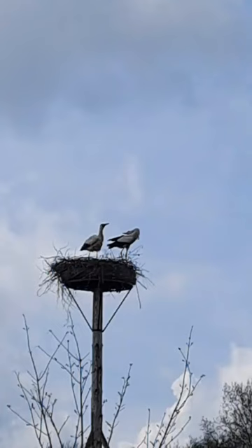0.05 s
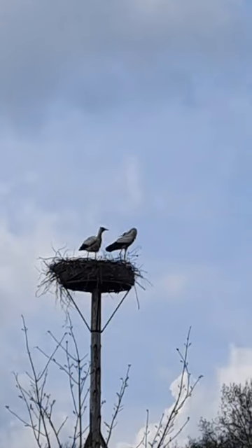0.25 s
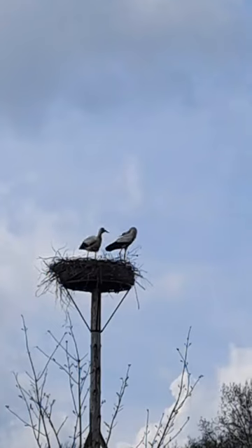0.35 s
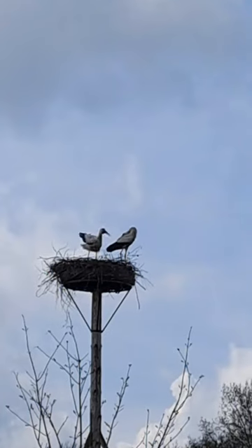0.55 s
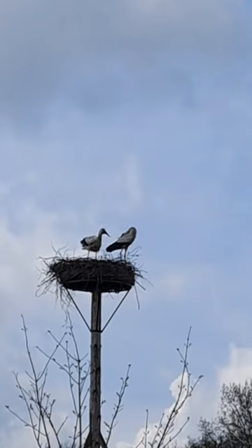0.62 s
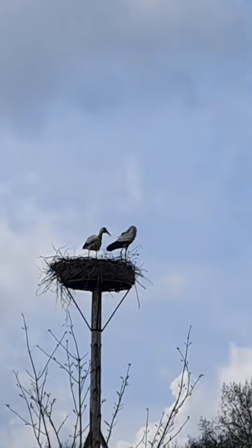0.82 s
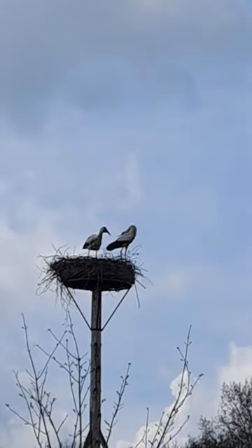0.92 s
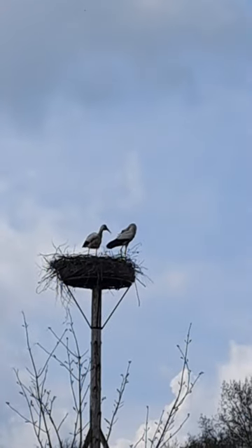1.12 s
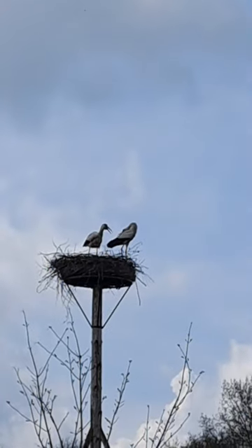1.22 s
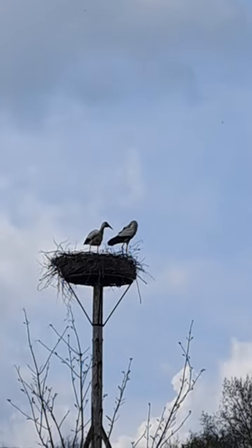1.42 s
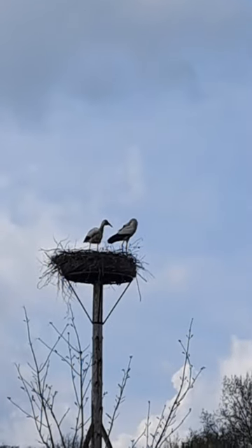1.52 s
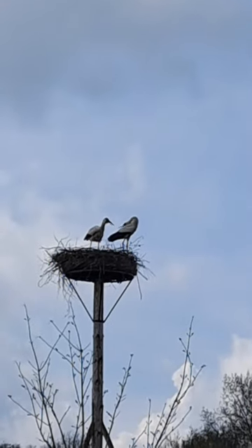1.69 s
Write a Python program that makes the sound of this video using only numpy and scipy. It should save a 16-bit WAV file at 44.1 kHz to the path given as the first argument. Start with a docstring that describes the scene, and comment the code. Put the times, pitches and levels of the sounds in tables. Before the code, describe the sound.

Fast, hollow bill clattering from a pair of storks, over gusts of wind on the microphone.

```python
"""Two storks clap their bills on a pole nest, one hollow and loud, the other thinner and a little faster. Each
impact excites the damped modes of bill and throat pouch, reflects once from the ground and scatters among twigs
and trees. Turbulent wind buffets the microphone, and small birds chirp far off. After a quieter opening the
sound drops out briefly and the scene changes."""
import sys
import numpy as np
from scipy import signal
from scipy.fft import rfft, irfft, next_fast_len
from scipy.io import wavfile
from scipy.ndimage import uniform_filter1d

SR = 44100
rng = np.random.default_rng(int(sys.argv[2]) if len(sys.argv) > 2 else 0)


def generate_wav(signal):
    """Clip the signal to [-1, 1] and save it as 16-bit WAV at the path in sys.argv[1]."""
    frames = np.transpose(np.atleast_2d(signal))
    scaled = np.clip(frames, -1, 1) * 32767
    pcm = np.round(scaled).astype(np.int16)
    wavfile.write(sys.argv[1], SR, pcm)


N = 77175
SILENCE_S = (0.18, 0.205)  # start and end


def amp(db):
    """Amplitude ratio of a level in decibels."""
    return 10 ** (np.asarray(db) / 20)


def along(points, hz):
    """Interpolation of (Hz, value) points on a logarithmic frequency axis."""
    point_hz, values = np.transpose(points)
    return np.interp(np.log(hz + 1), np.log(point_hz + 1), values)


def fade(t, t60):
    """Exponential damping: 60 dB lost in t60 seconds."""
    return np.exp(-np.log(1000) * t / t60)


def filtered(x, response):
    """Linear filtering: the spectrum of x times a frequency response."""
    size = next_fast_len(N + SR // 2)
    return irfft(rfft(x, size) * response(np.fft.rfftfreq(size, 1 / SR)), size)[..., :N]


def add(out, start_s, x):
    """Superposition of x on out from start_s onward."""
    i = max(round(start_s * SR), 0)
    out[i:i + len(x)] += x[:max(len(out) - i, 0)]


def impact_pulse(spectrum, size=1024):
    """Minimum phase gives the sharpest causal pulse with a given spectrum."""
    cepstrum = irfft(np.log(amp(along(spectrum, np.fft.rfftfreq(size, 1 / SR)))))
    cepstrum[1:size // 2] *= 2
    cepstrum[size // 2 + 1:] = 0
    return irfft(np.exp(rfft(cepstrum)))


def bill(claps, modes, snap, snap_db, grit, lead_s, lead_db, rebound_s, rebound_db):
    """Impact excitation: a light touch, the main blow and a rebound each snap and ring the modes."""
    out, t = np.zeros(N), np.arange(SR // 20) / SR
    hz, db, t60 = np.transpose(modes)[:, :, None]
    pulse = impact_pulse(snap)
    pouch, upper = hz < 1100, hz > 2600
    build_up = 1 - np.exp(-t / 0.00008)
    spread_db, detune_share = 2.5, 0.0048  # scatter of each mode from clap to clap
    for start_s, level_db, pitch, knock_db, upper_db, bright_db in claps:
        gain = amp(db + knock_db * pouch + upper_db * upper + spread_db * rng.standard_normal(hz.shape))
        tuned_hz = hz * pitch * (1 + detune_share * rng.standard_normal(hz.shape))
        ring = build_up * (gain * fade(t, t60) * np.cos(2 * np.pi * tuned_hz * t)).sum(0)
        for offset_s, contact_db in [(-lead_s, lead_db), (0, 0), (rebound_s, rebound_db)]:
            contact = grit * rng.standard_normal(len(t)) * fade(t, t60=0.0036)
            contact[0] = 1  # an impulse leads the grit
            crack = amp(snap_db + bright_db) * signal.fftconvolve(contact, pulse)[:len(t)]
            add(out, start_s + offset_s, amp(level_db + contact_db) * (ring + crack))
    return out


# Claps of each bill. Each row: start in seconds, level in dB, pitch factor, then the boosts
# of the low knock, the upper ring and the snap in dB.
HOLLOW_BILL_CLAPS = [(0.002, -21, 1.13, 2.5, 1, 6), (0.1305, -25, 1.06, 6, 4, 18.5),
                     (0.2608, 4, 0.96, -1.2, -1.5, -8), (0.374, 2.6, 1, -0.2, 2.5, -11),
                     (0.4876, 0, 0.97, 2.5, 1.9, 0.0), (0.6024, 0.1, 0.97, 1.5, -3.5, 6),
                     (0.7158, 0, 0.96, 0, -2.1, 5.5), (0.8302, -1, 1.026, 1.2, -1.5, 1),
                     (0.9439, -2.0, 1.001, -0.5, -0.5, -16), (1.0586, 0, 0.998, -4, -4, 2),
                     (1.1726, -5.5, 1.0, 3.5, 2, 6.5), (1.2851, -1.4, 1.03, 0.9, 1.5, -5),
                     (1.3975, -5, 1.03, -1.3, 2, 0), (1.5106, -0.5, 1.02, -2.2, 1.3, -15),
                     (1.6239, 3, 1, 3, 0.7, -9), (1.7371, 1.6, 0.98, 1, 2.4, -2)]
THIN_BILL_CLAPS = [(0.2557, 1, 0.99, -7, -14, -8), (0.3548, 0.3, 0.95, -0.5, 5, -5),
                   (0.4527, -5, 0.94, 2.0, 1, -2), (0.548, -4.7, 0.96, 1, -2, 0),
                   (0.6436, -2.5, 0.97, 2.7, 4.2, 0), (0.7412, -2, 0.99, -2, 2, 1.5),
                   (0.8374, -4.5, 0.98, 3, 0.0, 4.5), (0.9313, -1.5, 0.985, 0.8, -3, -6.5),
                   (1.0272, -1, 1, -0.5, -2.5, -7.5), (1.1232, -2, 0.993, -2.5, -0.8, -5.5),
                   (1.2177, -3, 1, -0.7, 1.3, 0.5), (1.3135, -4.5, 0.997, 2, 7, 1.5),
                   (1.4088, 0.9, 0.99, -5.5, -1.5, -2), (1.5043, -3, 0.91, 6, 0.0, 0.0),
                   (1.6014, -2, 0.999, 1.5, -1.5, 2), (1.6976, -0.6, 0.94, 2, 5.5, -3)]
# Modes of bill and throat pouch. Each row: frequency in Hz, level in dB, t60 in seconds.
HOLLOW_BILL_MODES = [(648, -33, 0.022), (1204, -47, 0.007), (1621, -27, .012), (2057, -43, .016),
                     (2340, -40.5, 0.028), (2863, -39.5, 0.015), (3103, -37, 0.016), (3524, -45, 0.016),
                     (3756, -49, 0.022), (4237, -59, 0.032)]
THIN_BILL_MODES = [(912, -37, .014), (1651, -36, 0.015), (2320, -48, 0.018), (2715, -56.5, 0.025),
                   (3156, -43, .014), (3870, -52, .012), (4290, -59.5, 0.02)]
# Spectrum of the snap as the bill halves meet. Each row: frequency in Hz, level in dB.
HOLLOW_SNAP_SPECTRUM = [(200, -4), (600, -27.5), (1500, -13), (3500, -23), (5500, -20), (8000, -25),
                        (11000, -33.5), (15000, -28.5)]
THIN_SNAP_SPECTRUM = [(200, 3), (700, -1), (1500, -9.5), (3500, -3.5), (5500, -4.5), (8000, -5),
                      (11000, -14), (15000, -16)]
def storks(dull_hz=10800):
    """Modal ringing of two bills, with the treble softened above about 11 kHz."""
    hollow = bill(HOLLOW_BILL_CLAPS, HOLLOW_BILL_MODES, HOLLOW_SNAP_SPECTRUM, snap_db=-8.5, grit=0.18,
                  lead_s=0.00141, lead_db=-14, rebound_s=0.001963, rebound_db=-26.5)
    thin = bill(THIN_BILL_CLAPS, THIN_BILL_MODES, THIN_SNAP_SPECTRUM, snap_db=-21.5, grit=0.31,
                lead_s=0.000837, lead_db=-36.5, rebound_s=0.00186, rebound_db=-2)
    return filtered(hollow + thin, lambda hz: 1 / np.sqrt(1 + (hz / dull_hz) ** 4))


def delayed_resonance(hz, centre_hz, width_hz, db, delay_s):
    """Transfer function of a band-pass resonance with a gain and a delay."""
    resonance = 1j * hz * width_hz / (centre_hz ** 2 - hz ** 2 + 1j * hz * width_hz)
    return amp(db) * resonance * np.exp(-2j * np.pi * hz * delay_s)


# Side-channel ring. Each row: centre in Hz, width in Hz, gain in dB, delay in seconds.
STEREO_RESONANCE = [(516, 160, -14, 0.0024), (1720, 620, 3.5, 0.002285), (2200, 150, 1.5, 0.000011),
                    (5330, 250, 3.5, 0.0024), (11700, 1000, -1.5, 0.00011)]
def stereo_widening(mid):
    """The recorder's stereo widening: delayed resonances ring each clack between left and right."""
    side = filtered(mid, lambda hz: sum(delayed_resonance(hz, *row) for row in STEREO_RESONANCE))
    return np.array([mid + side, mid - side])


def ground_echo(clacks):
    """Reflection: the ground returns one band-limited echo."""
    return filtered(clacks, lambda hz: delayed_resonance(hz, 1680, width_hz=2400, db=-11, delay_s=0.011))


def diffuse_tail(x, t60s):
    """Diffuse reverberation: each stretch of x is convolved with fresh decaying noise per channel."""
    out = np.zeros((2, N))
    for stretch in np.array_split(np.arange(N), 14):
        hz, t, noise = signal.stft(rng.standard_normal((2, SR // 3)), SR, nperseg=256)
        responses = signal.istft(noise * fade(t, along(t60s, hz)[:, None]), SR, nperseg=256)[1]
        for channel, response in zip(out, responses):
            echo = signal.fftconvolve(x[stretch], response / np.linalg.norm(response))
            add(channel, stretch[0] / SR, echo)
    return out


# Reverberation of the trees. Each row: frequency in Hz, t60 in seconds.
TREE_DECAY = [(300, 0.11), (1650, 0.14), (4000, 0.053), (9000, 0.2), (15000, 0.034)]
def scatter(clacks, twigs_hz=3700):
    """Scattering: nest twigs return the treble, the trees a fuller tail."""
    treble = filtered(clacks, lambda hz: hz ** 2 / (hz ** 2 + twigs_hz ** 2))
    twigs = amp(1) * diffuse_tail(treble, t60s=[(1, 0.11)])
    return twigs + amp(-10) * diffuse_tail(clacks, TREE_DECAY)


def rush(spectrum, side_db):
    """Partly coherent stereo noise with the given spectrum and an rms of 1."""
    mid, side = filtered(rng.standard_normal((2, N)), lambda hz: amp(along(spectrum, hz)))
    noise = np.array([mid + amp(side_db) * side, mid - amp(side_db) * side])
    return noise / np.sqrt(np.mean(noise ** 2) + 1e-20)


def buffet(spectrum, window):
    """Turbulent pressure at two ports, evened over window samples so that the gusts set its level."""
    noise = rush(spectrum, side_db=0.5)
    return noise / np.sqrt(np.abs(uniform_filter1d(noise ** 2, size=window)))


# Gusts in the deep rumble and the low-mid flutter. Each row: time in seconds, relative level in dB.
RUMBLE_GUSTS = [(0.2, -3.5), (0.212, -25.5), (0.26, -26), (0.346, -38), (0.368, -33.5), (0.42, -51.5),
                (0.44, -30), (0.484, -24), (0.544, -31.5), (0.618, -27), (0.63, -32.5), (0.752, -31.5),
                (0.83, -25.5), (0.872, -46), (1.088, -37), (1.114, -43), (1.226, -46.5), (1.256, -37),
                (1.41, -54), (1.452, -34), (1.486, -37), (1.534, -51), (1.564, -40), (1.59, -52),
                (1.632, -42), (1.68, -53.5), (1.75, -45)]
FLUTTER_GUSTS = [(0.244, -52), (0.27, -46), (0.325, -55.5), (0.36, -46), (0.42, -58), (0.48, -32.5),
                 (0.536, -53.5), (0.56, -38.5), (0.638, -49), (0.686, -50.5), (0.73, -45), (0.826, -35),
                 (0.925, -82), (0.968, -49), (0.994, -91), (1.072, -49.5), (1.126, -69.5), (1.238, -67),
                 (1.368, -104), (1.466, -50.5), (1.504, -56.5), (1.53, -70.5), (1.628, -64), (1.672, -102),
                 (1.75, -67)]
# Balance of the gusts. Each row: time in seconds, left minus right in dB.
GUST_PAN = [(.1, 23.5), (.33, -8.5), (.55, -2.5), (.78, 1), (.95, 10.5), (1.2, 13), (1.7, 18.5)]
# Spectra of the wind's layers. Each row: frequency in Hz, relative level in dB.
RUMBLE_SPECTRUM = [(15, -47), (28, -18.5), (55, 2.5), (82, 1), (130, -10), (180, -22), (300, -42),
                   (700, -72)]
FLUTTER_SPECTRUM = [(60, -46), (130, 5.5), (190, 7), (260, -2), (350, -8), (500, -24), (900, -36),
                    (3000, -66)]
OPENING_AIR_SPECTRUM = [(100, 9.5), (400, -1), (700, 4.5), (1100, 0), (1700, -6), (2000, 4), (2400, -9.5),
                        (5000, -12), (10000, -16.5), (15000, -23)]
AIR_SPECTRUM = [(100, 1), (240, -5.5), (350, 11.5), (480, 1.5), (700, 0.5), (1200, 0), (1680, -4),
                (2100, -5), (3200, -8), (4500, -15), (6000, -16.5), (10000, -24.5), (15000, -34)]
def wind(t):
    """Turbulence buffets the microphone, later mostly its left port, over a steady rush of air."""
    opening = t < np.mean(SILENCE_S)
    curve = lambda rows: np.interp(t, *np.transpose(rows))
    rumble_db = np.where(opening, -63.5, 1 + curve(RUMBLE_GUSTS))
    flutter_db = np.where(opening, -84, 4.5 + curve(FLUTTER_GUSTS))
    rumble = amp(rumble_db) * buffet(RUMBLE_SPECTRUM, window=1300)
    flutter = amp(flutter_db) * buffet(FLUTTER_SPECTRUM, window=700)
    opening_air = amp(-66) * rush(OPENING_AIR_SPECTRUM, side_db=-1.5)
    air = amp(-57.5) * rush(AIR_SPECTRUM, side_db=-1)
    pan = amp(np.outer([0.5, -0.5], curve(GUST_PAN)))
    return pan * (rumble + flutter) + np.where(opening, opening_air, air)


# Distant chirps. Each row: start and length in seconds, first and last pitch in Hz, level in dB.
BIRD_CHIRPS = [(0.3, 0.075, 2800, 3520, -63), (0.99, .038, 5780, 5380, -72), (1.1, .036, 5750, 5300, -72),
               (1.55, 0.0458, 5720, 5350, -71), (1.684, 0.026, 5720, 5600, -69)]
def small_birds(bend=0.12):
    """Frequency modulation: thin whistles glide along an arch and reverberate among the trees."""
    out = np.zeros(N)
    for start_s, length_s, first_hz, last_hz, db in BIRD_CHIRPS:
        progress = np.linspace(0, 1, round(length_s * SR))
        arch = np.sin(np.pi * progress)
        glide_hz = last_hz - first_hz
        hz = first_hz + glide_hz * progress + bend * abs(glide_hz) * arch
        add(out, start_s, amp(db) * arch * np.sin(2 * np.pi * np.cumsum(hz) / SR))
    return out + amp(-4) * diffuse_tail(out, TREE_DECAY)


# Single eddies. Each row: centre time in seconds, pitch in Hz, level in dB, left minus right in dB.
EDDIES = [(0.484, 105, -12.5, 1), (0.608, 58, -23, 4), (0.825, 70, -14, 0), (0.969, 116, -43.5, 16),
          (1.072, 116.5, -25.5, 4), (1.562, 72.4, -34, 11)]
def eddy_thumps(half_width_cycles=0.86):
    """A passing eddy swings the pressure at both microphone ports in a Gaussian wave packet."""
    out, t = np.zeros((2, N)), np.arange(N) / SR
    for centre_s, hz, db, pan_db in EDDIES:
        cycles = hz * (t - centre_s)
        swing = np.cos(2 * np.pi * (cycles + rng.uniform(0, 0.39, (2, 1))))
        gain = amp(db + pan_db * np.array([[0.5], [-0.5]]))
        out += gain * swing * np.exp(-(cycles / half_width_cycles) ** 2)
    return out


def scene():
    """Superposition of storks, wind and birds, gated to silence briefly after the opening."""
    t = np.arange(N) / SR
    start_s, end_s = SILENCE_S
    gate = np.clip(np.maximum(start_s - t, t - end_s) / 0.00453, 0, 1)
    clacks = storks()
    clatter = stereo_widening(clacks + ground_echo(clacks)) + scatter(clacks)
    return gate * (clatter + wind(t) + eddy_thumps() + small_birds())


def record(dry):
    """Band limiting: an ideal low-pass filter ends the spectrum at 15.8 kHz."""
    return filtered(dry, lambda hz: hz < 15800)


dry = scene()
out = record(dry)
generate_wav(out)
```